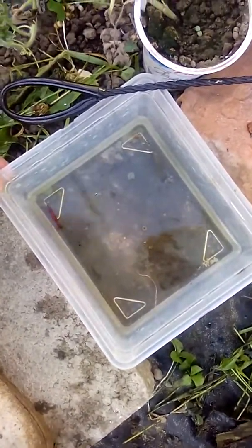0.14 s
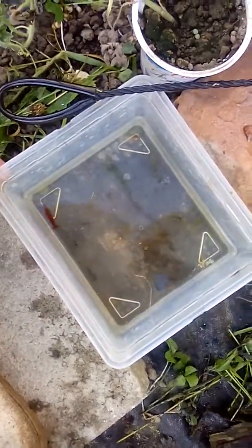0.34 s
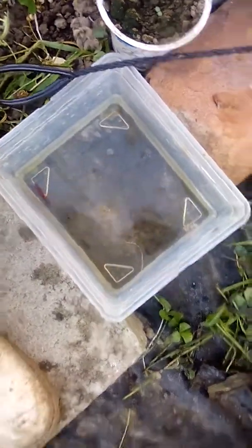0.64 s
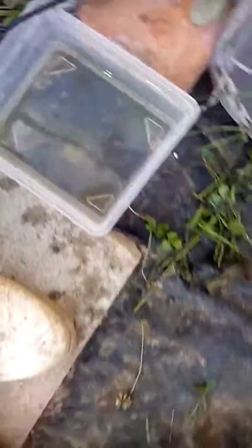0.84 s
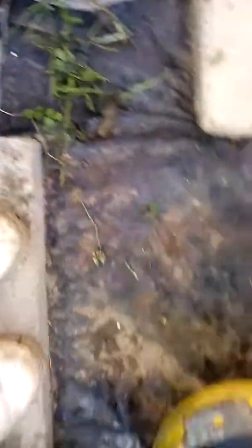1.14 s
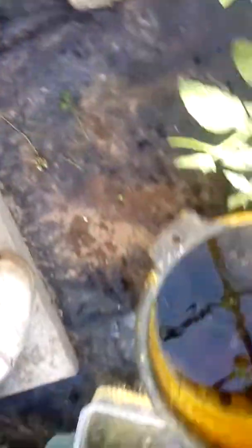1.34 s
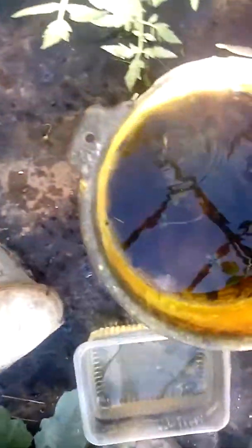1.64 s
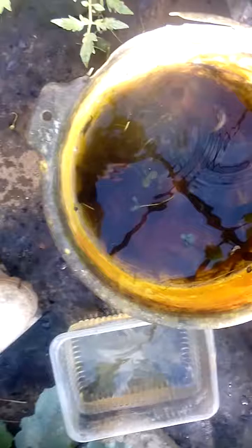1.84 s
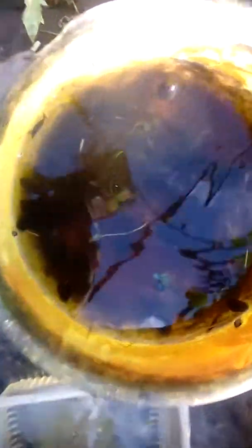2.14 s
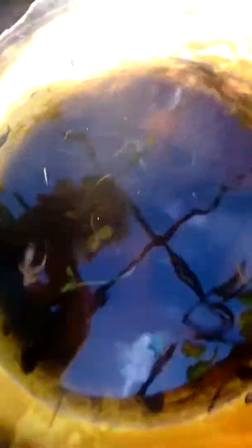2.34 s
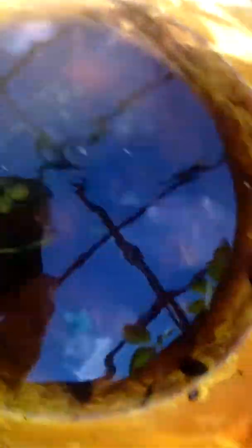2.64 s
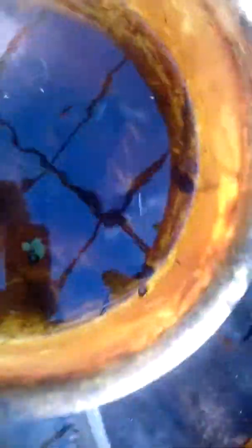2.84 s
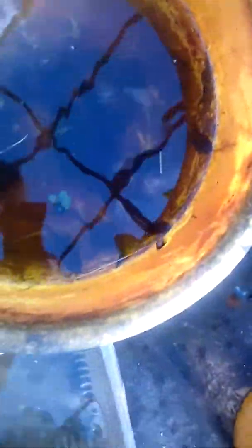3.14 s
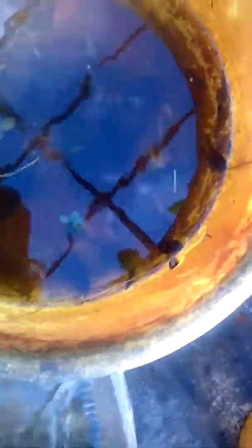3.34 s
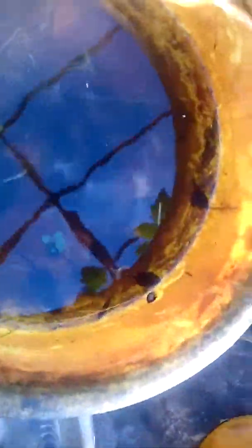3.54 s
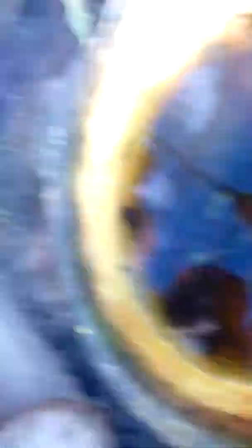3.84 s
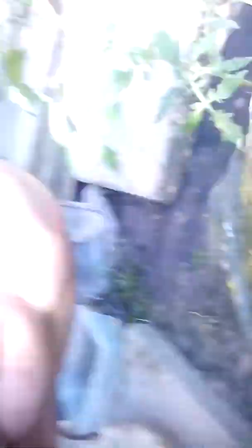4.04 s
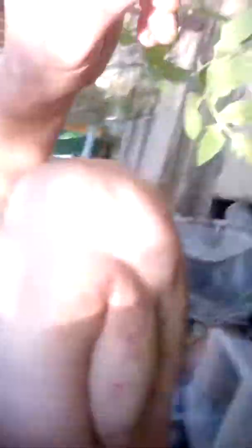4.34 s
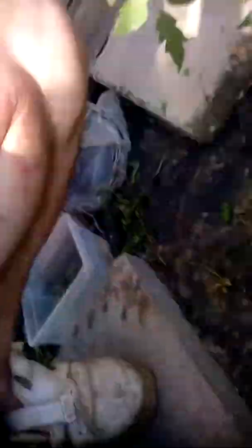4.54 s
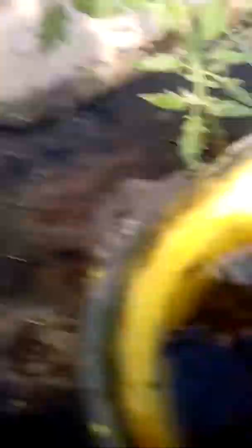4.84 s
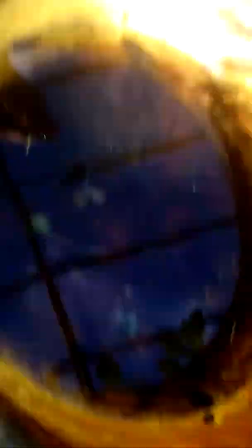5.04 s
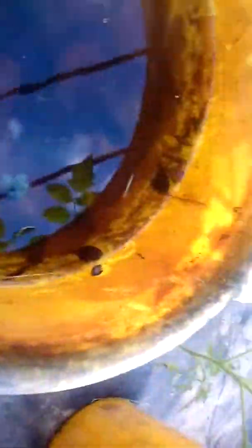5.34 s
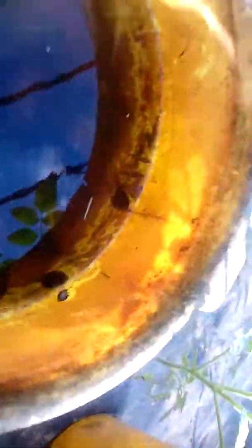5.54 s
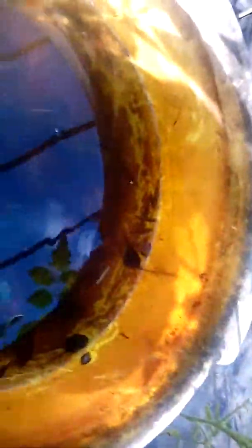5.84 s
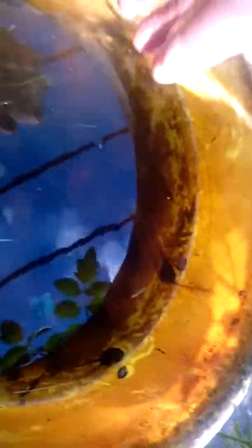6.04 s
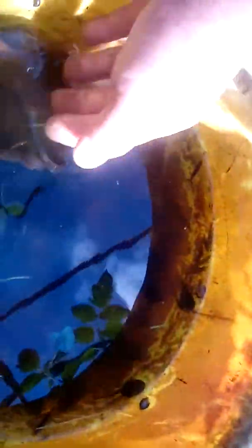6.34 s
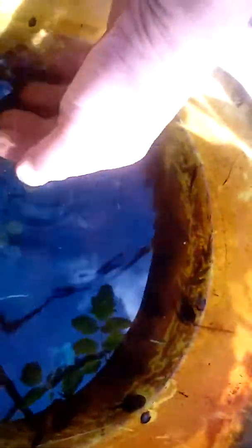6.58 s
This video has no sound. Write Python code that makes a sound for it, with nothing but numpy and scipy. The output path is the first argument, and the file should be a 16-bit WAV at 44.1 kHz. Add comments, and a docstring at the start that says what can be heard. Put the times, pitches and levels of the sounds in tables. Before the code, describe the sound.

Feet thud, scuff and crunch on a gritty plastic sheet in a quiet garden, with one sharp plastic click and clothing swishes.

```python
"""Someone shifts about beside a water tub in a quiet garden, carrying the microphone; air rumbles faintly.
A soft mid-pitched hush swells at the start and again near 4 s; faint soft plops sound from 0.7 s.
From about 1 s feet thud and scuff on a gritty plastic ground sheet, and the tub rings with the scuffs.
At 2.76 s hard plastic gives one sharp click, amid a few small ones; from 2.85 s the sheet crunches.
From 4.7 s clothing swishes. Ground and nearby pots answer briefly; steps shake the microphone."""
import sys
import numpy as np
from scipy import signal
from scipy.fft import rfft, irfft, next_fast_len
from scipy.io import wavfile
from scipy.ndimage import uniform_filter1d, map_coordinates

SR = 44100
rng = np.random.default_rng(int(sys.argv[2]) if len(sys.argv) > 2 else 0)


def inscribe(sig):
    """Save sig as 16-bit PCM at rate SR to the path in sys.argv[1].

    A 1-D sig is mono; a 2-D sig holds one channel per row.
    Samples are clipped to [-1, 1] before scaling.
    """
    pcm = np.round(np.clip(np.atleast_2d(sig).T, -1, 1) * 32767)
    wavfile.write(sys.argv[1], SR, pcm.astype(np.int16))


N = 295911

# air rumble and a soft hush that swells at the start and near 4 s: time_s, rumble_db, hush_db
BACKGROUND_LEVELS = [(0, -69.5, -60.5), (.3, -64, -63), (.7, -63.5, -66.5), (.98, -61, -64.5),
                     (1.12, -67.5, -70), (1.8, -60, -68.5), (2.4, -63, -70), (2.65, -64.5, -71),
                     (3.1, -60.5, -68), (3.4, -64.5, -71.5), (3.8, -63.5, -66.5), (4.05, -64, -62),
                     (4.7, -67.5, -66.5), (5.1, -64, -71.5), (5.35, -64.5, -71.5), (5.45, -65.5, -75),
                     (5.75, -65, -71), (6.15, -64.5, -75), (6.35, -66.5, -74), (6.55, -65.5, -69),
                     (6.7, -66, -72.5)]
# decay of the yard's scatter: freq_hz, t60_s
YARD_DECAY = [(100, 0.48), (1200, 0.21), (5000, 0.26), (12000, 0.0955)]
# plastic tub modes: freq_hz, width_hz, level_db
TUB_MODES = [(549.5, 16, -7), (779, 48.7, -6), (795, 25, -8), (944, 13, -3.5), (1390, 55, -4.5),
             (1800, 29, 4), (2030, 23, -7.5)]
# clothing brushing past: start_s, rise_s, hold_s, t60_s, hiss_db, fold_db, fold_hz
CLOTH_STROKES = [(4.727, 0.16, 0.11, 0.85, -69, -63, 1700), (4.993, 0.076, 0.019, 0.13, -60.5, -77, 2080),
                 (5.01, 0.043, 0.11, 0.21, -72, -63, 687), (5.168, 0.086, 0.0094, 0.17, -54.5, -67, 2200),
                 (5.27, 0.036, 0.013, 0.19, -58, -68.5, 2190),
                 (5.545, 0.025, 0.015, 0.17, -76, -76.5, 2505),
                 (5.777, 0.16, 0.027, 0.17, -75.5, -67.5, 2130)]
# fine grit ticking: start_s, peak_db, resonance_hz
GRIT_TICKS = [(2.098, -48.5, 9400), (2.862, -53.5, 10500), (3, -57, 8100), (3.638, -54, 8000),
              (3.658, -57.5, 7800), (4.017, -52.5, 11000), (4.189, -56.5, 7400), (4.327, -47, 10100),
              (4.5005, -47.5, 11500), (4.537, -53, 12000), (5.07, -53, 7340), (5.087, -52, 7250)]
# creases and grit snapping: start_s, level_db, resonance_hz
CREASE_SNAPS = [(1.5225, -53, 1710), (1.603, -47, 2000), (1.6088, -41, 2000), (1.7173, -47, 1500),
                (1.7235, -46, 2000), (1.9585, -40, 1590), (2.0987, -25, 6400), (2.109, -39, 6030),
                (2.116, -30, 6300), (2.567, -43, 4900), (2.579, -46, 4770), (2.862, -42, 3260),
                (2.9013, -35, 4000), (2.9142, -27, 3420), (2.929, -22, 3700), (2.955, -39, 4200),
                (2.982, -50, 3800), (3.001, -38, 3600), (3.076, -50, 2200), (3.104, -34.5, 5880),
                (4.018, -44, 4870), (4.3268, -28.5, 3220), (4.339, -30, 1900), (4.36, -37, 3000),
                (4.37, -32, 2840), (4.409, -35, 3460), (4.4129, -39, 4070), (4.4237, -22.5, 3350),
                (4.496, -29, 3330), (4.5004, -24, 4150), (4.504, -32, 4640), (4.5369, -28, 3060),
                (4.867, -39.5, 2970), (4.9325, -52, 2900), (4.954, -52, 2710), (4.967, -42, 2560)]
# soles sliding: start_s, rise_s, hold_s, t60_s, rub_db, grit_db, hollow_db, hollow_hz
SOLE_STROKES = [(1.325, 0.077, 0.03, 1, -64.5, -74, -75, 1630),
                (1.516, 0.0022, 0.03, 0.12, -55.5, -65.5, -60, 1580),
                (1.535, 0.023, 0.017, 0.14, -49.5, -62, -62, 1880),
                (1.6, 0.003, 0.0069, 0.18, -47, -57.5, -58, 1990),
                (1.705, 0.008, 0.0052, 0.29, -45.5, -58.5, -51.5, 630),
                (1.79, 0.0025, 0.0052, 0.38, -48, -64.5, -68, 1970),
                (1.875, 0.0054, 0.11, 0.32, -52, -67, -75, 1820),
                (1.955, 0.004, 0.033, 0.6, -41.5, -51, -56.5, 604),
                (1.959, 0.056, 0.027, 0.2, -43.5, -45.5, -43, 1820),
                (2.001, 0.043, .02, 0.24, -58, -46, -49.5, 750),
                (2.084, 0.011, 0.0186, 0.051, -42.5, -46.5, -42.5, 598),
                (2.113, 0.024, 0.0164, 0.13, -42.5, -51, -58, 930),
                (2.321, .05, .01, 0.17, -67, -85, -64, 1050),
                (2.537, 0.14, 0.032, 0.5, -69, -65, -78, 1900),
                (3.03, 0.044, 0.033, 0.063, -43.5, -53, -51.5, 990),
                (3.095, 0.0062, 0.005, 0.44, -60, -60.5, -66.5, 1040),
                (5.56, .02, 0.019, 0.16, -71.5, -73, -82, 3210)]
# sheet crumpling: start_s, rise_s, hold_s, t60_s, rub_db, crackle_db, fizz_db, hollow_db, hollow_hz
SHEET_STROKES = [(2.849, 0.014, 0.015, 0.25, -52.5, -56, -70, -80, 2940),
                 (2.874, 0.043, 0.005, 0.5, -49, -48, -88, -60.5, 1310),
                 (3.624, 0.032, 0.0054, 0.19, -77, -66, -77, -64, 1570),
                 (4.002, 0.0047, 0.014, 0.56, -58.5, -62.5, -90, -59, 1610),
                 (4.272, 0.028, 0.015, 0.27, -77, -59, -101, -62, 3370),
                 (4.32, 0.0056, 0.082, 0.23, -48, -50.5, -74, -66, 1730),
                 (4.376, 0.036, 0.029, 0.42, -44, -45.5, -72.5, -55.5, 734),
                 (4.471, 0.019, 0.026, 0.22, -50.5, -46, -60, -59.5, 583),
                 (4.854, 0.0038, 0.099, 0.38, -62, -67.5, -102, -72.5, 2900)]
# foot thuds and faint soft plops (0.724, 0.887, 2.525 s): start_s, peak_db, pitch_hz, t60_s
THUDS_AND_PLOPS = [(0.724, -55, 417, 0.055), (0.887, -57, 322, 0.099), (1.01, -55, 120, 0.094),
                   (1.32, -55, 106, 0.07), (1.5248, -32, 90, 0.07), (1.5546, -26.5, 90, 0.069),
                   (1.571, -30.5, 81.5, 0.05), (1.603, -41.5, 490, 0.042), (1.67, -37.5, 73, 0.073),
                   (1.710, -31, 595, 0.019), (1.753, -40, 292, 0.028), (2.525, -54.5, 335, 0.076),
                   (2.861, -40, 73.6, 0.066), (3.675, -45.5, 74, 0.092), (4.02, -40, 88.5, 0.026),
                   (5.045, -50.5, 63, 0.076), (5.12, -51, 62, 0.069), (5.33, -54, 231, 0.074)]
# hard plastic flipping: start_s, level_db, pitch_hz, t60_s, snap_relative_db
PLASTIC_CLICKS = [(1.7858, -30.5, 850, 0.0037, -30), (1.7866, -24, 2265, 0.0023, -13.5),
                  (1.8853, -30.5, 2230, 0.0026, -19), (2.7622, -7.5, 1530, 0.0024, -9.5),
                  (2.7643, -36, 1480, 0.0077, 5), (2.7748, -34.5, 1410, 0.0041, -15),
                  (3.656, -47.5, 2320, 0.015, -14), (3.775, -34.5, 1700, 0.0041, -42),
                  (4.0186, -31.5, 1900, 0.0017, -11)]

# low rumble of air and shaken microphone: freq_hz, level_db
RUMBLE_SPECTRUM = [(12, -34), (20, -21.5), (54, -2.5), (107, 0), (145, 0.5), (274, -6), (344, -9),
                   (551, -15.5), (600, -12.5), (780, -42), (1320, -120)]
# soft mid-pitched hush: freq_hz, level_db
HUSH_SPECTRUM = [(210, -41.5), (350, -4.5), (496, -20), (700, -9.5), (1100, -8.5), (1500, -7.5),
                 (2000, -9.5), (2840, -29.5), (5000, -34), (8000, -58)]
# microphone hiss: freq_hz, level_db
HISS_SPECTRUM = [(300, -15.5), (1000, -2), (3000, 0.5), (6000, -0.5), (7960, -14), (11000, -16.5),
                 (15500, -18.5)]
# sliding fabric: freq_hz, level_db
CLOTH_SPECTRUM = [(1760, -8.5), (3000, -14.5), (4030, -2), (5610, -2), (7400, 4.5), (8880, -13.5),
                  (10600, -9.5), (12400, -16.5), (15500, -31.5)]
# rubbing sole: freq_hz, level_db
SOLE_SPECTRUM = [(120, -48.5), (200, -9), (400, -8), (528, -8.5), (639, -1), (703, -2.5), (972, -0.5),
                 (1230, -5.5), (1750, -2), (1900, -6.5), (2070, -4.5), (2440, -3.5), (3500, -31),
                 (4550, -21), (7700, -120)]
# coarse grit: freq_hz, level_db
GRIT_SPECTRUM = [(1410, -34), (2400, -6), (2720, -2), (3400, -2.5), (4410, 2), (6270, 2.5), (6780, -1),
                 (8560, -31), (9410, -25.5), (10500, -26.5), (11400, -25.5), (13100, -37), (15500, -37.5)]
# fizz of the sharpest contacts: freq_hz, level_db
FIZZ_SPECTRUM = [(5000, -33), (8000, 2.5), (11000, -2), (13500, -9.5), (15500, -2)]
# body of the ground sheet: freq_hz, level_db
SHEET_SPECTRUM = [(88, -40), (150, 0), (335, -12), (446, -4), (658, -4.5), (737, 2), (1130, 0),
                  (1520, -5.5), (3000, -13.5), (3900, -24), (6600, -120)]
# crackling creases: freq_hz, level_db
CREASE_SPECTRUM = [(940, -32.5), (1600, 1), (1880, -3), (2210, 1), (2750, 1.5), (3230, 0.5), (3550, 0.5),
                   (4260, 3.5), (7250, -5), (8050, -23), (10900, -22.5), (12000, -23), (15500, -40)]
# snap of hard plastic: freq_hz, level_db
SNAP_SPECTRUM = [(300, -24), (700, 6), (2000, -22), (3200, -6.5), (4300, -2), (5200, -3), (6500, -5),
                 (7500, -43.5), (8500, -41.5), (15000, -37)]
# rattle after a click: freq_hz, level_db
RATTLE_SPECTRUM = [(250, -23), (500, 0), (900, 1), (1400, 2), (2100, -4), (3000, -10), (5000, -9.5),
                   (6500, -15), (8000, -37.5), (15000, -53)]


def amp(db):
    """Decibels to gain."""
    return 10 ** (np.asarray(db) / 20)


def unit(x):
    """Scale to rms 1."""
    return x / np.sqrt(np.mean(x ** 2) + 1e-20)


def along(points, hz):
    """(freq_hz, value) points read on a log axis."""
    freq_hz, values = np.transpose(points)
    return np.interp(np.log(hz + 1), np.log(freq_hz + 1), values)


def add(track, start_s, sound):
    """Mix a sound into a track."""
    part = track[round(start_s * SR):][:len(sound)]
    part += sound[:len(part)]


def filtered(x, response):
    """x through a frequency response."""
    size = next_fast_len(N + 8192)
    return irfft(rfft(x, size) * response(np.fft.rfftfreq(size, 1 / SR)), size)[:N]


def coloured(x, spectrum):
    """x through a spectrum, at rms 1."""
    return unit(filtered(x, lambda hz: amp(along(spectrum, hz))))


def impulse(spectrum, size=1024):
    """Minimum-phase impulse with this spectrum, peak 1."""
    magnitude = amp(along(spectrum, np.fft.rfftfreq(size, 1 / SR)))
    cepstrum = irfft(np.log(magnitude + 1e-6))
    cepstrum[1:size // 2] *= 2
    cepstrum[size // 2 + 1:] = 0
    pulse = irfft(np.exp(rfft(cepstrum)))
    return pulse / np.abs(pulse).max()


def ring(hz, t60_s, attack_s):
    """One damped mode with a soft start, peak 1."""
    t = np.arange(SR // 5) / SR
    wave = np.sin(2 * np.pi * hz * t) * amp(-60 * t / t60_s) * (1 - np.exp(-t / attack_s))
    return wave / np.abs(wave).max()


def wobble(rate_hz, depth_db):
    """Smooth random gain."""
    knots = rng.standard_normal(int(N * rate_hz / SR) + 4)
    return amp(depth_db * map_coordinates(knots, [np.arange(N) * rate_hz / SR]))


def patchy(x, depth_db, below_hz=2800):
    """Lower bands swell and fade independently, shifting the colour; rms 1."""
    hz, _, bands = signal.stft(x, SR, nperseg=512)
    field = uniform_filter1d(rng.standard_normal(bands.shape), size=2, axis=0)
    field = unit(uniform_filter1d(field, size=22, axis=1))
    swell_db = field * depth_db / (1 + (hz[:, None] / below_hz) ** 2)
    return unit(signal.istft(bands * amp(swell_db), SR, nperseg=512)[1][:N])


def gains(strokes):
    """Strokes build, hold and decay: one gain curve per level column."""
    t, power = np.arange(N) / SR, 0
    for start_s, rise_s, hold_s, t60_s, *levels_db in strokes:
        rise = np.clip((t - start_s) / rise_s, 0, 1)
        decay = amp(-60 * np.maximum(t - start_s - rise_s - hold_s, 0) / t60_s)
        power = power + np.outer(amp(levels_db), rise * decay) ** 2
    return np.sqrt(power)


def grains(rate_hz, spread_db, share):
    """Tiny uneven contacts take a share of the power; the rest is smooth friction."""
    contacts = (rng.random(N) < rate_hz / SR) * rng.choice([-1, 1], N)
    sizes = amp(spread_db * np.clip(rng.standard_normal(N), -2, 2))
    return np.sqrt(share) * unit(contacts * sizes) + np.sqrt(1 - share) * rng.standard_normal(N)


def background(hiss_db=-74):
    """Uneven low air rumble, a soft swelling hush and steady microphone hiss."""
    time_s, *levels_db = np.transpose(BACKGROUND_LEVELS)
    rumble_gain, hush_gain = [amp(np.interp(np.arange(N) / SR, time_s, db)) for db in levels_db]
    rumble = unit(coloured(rng.standard_normal(N), RUMBLE_SPECTRUM) * wobble(rate_hz=14, depth_db=2.7))
    hiss = coloured(rng.standard_normal(N), HISS_SPECTRUM)
    hush = patchy(coloured(rng.standard_normal(N), HUSH_SPECTRUM), depth_db=3.2)
    return rumble_gain * rumble + hush_gain * hush + amp(hiss_db) * hiss


def jostle(steps, gain_db=-27, exponent=0.66, settle_s=0.032):
    """Each shift of weight shakes the carried microphone, which rumbles until it settles."""
    pole = np.exp(-1 / (settle_s * SR))
    shake = signal.lfilter([1 - pole], [1, -pole], np.abs(steps))
    return amp(gain_db) * shake ** exponent * coloured(rng.standard_normal(N), RUMBLE_SPECTRUM)


def yard(x, wet_db, bounce_s=0.016, bounce_db=-27):
    """One bounce off the ground and a short scatter from pots and walls."""
    hz, t, bands = signal.stft(rng.standard_normal(SR // 3), SR, nperseg=256)
    decay = amp(-60 * t / along(YARD_DECAY, hz)[:, None])
    tail = signal.istft(bands * decay, SR, nperseg=256)[1]
    scatter = signal.fftconvolve(x, tail / np.linalg.norm(tail))[:N]
    bounce = filtered(x, lambda f: np.exp(-2j * np.pi * f * bounce_s))
    return amp(bounce_db) * bounce + amp(wet_db) * scatter


def tub(x, gain_db=-3):
    """The nearby plastic tub rings along in a few short modes."""
    def modes(f):
        return sum((-1) ** k * amp(db) * 1j * f * width_hz / (hz ** 2 - f ** 2 + 1j * f * width_hz)
                   for k, (hz, width_hz, db) in enumerate(TUB_MODES))
    return amp(gain_db) * filtered(x, modes)


def hollow(strokes, contacts, q):
    """A gap or fold rings at its own pitch in each stroke."""
    out = np.zeros(N)
    for start_s, rise_s, hold_s, t60_s, *_, db, hz in strokes:
        gain, = gains([(start_s, rise_s, hold_s, t60_s, db)])
        gap = signal.iirpeak(hz, q, SR)
        out += gain * unit(signal.lfilter(*gap, signal.lfilter(*gap, contacts)))
    return out


def swishes(hiss_db=-1):
    """Fabric slides over itself with a fine hiss; its folds catch unevenly and sound hollow."""
    hiss_gain, = gains([row[:-2] for row in CLOTH_STROKES])
    fibres = grains(rate_hz=1700, spread_db=2, share=0.59)
    folds = patchy(fibres * wobble(rate_hz=60, depth_db=1.5), depth_db=4)
    hiss = amp(hiss_db) * hiss_gain * coloured(fibres, CLOTH_SPECTRUM)
    return hiss + hollow(CLOTH_STROKES, folds, q=2.8)


def ticks(t60_s=0.0175, q=7):
    """Single hard grains skid and ring, high and brief."""
    out, t = np.zeros(N), np.arange(SR // 50) / SR
    for start_s, peak_db, hz in GRIT_TICKS:
        skid = rng.standard_normal(len(t)) * amp(-60 * t / t60_s)
        tick = signal.lfilter(*signal.iirpeak(hz, q, SR), skid)
        add(out, start_s, amp(peak_db) * tick / np.abs(tick).max())
    return out


def snaps(gain_db=-1, t60_s=0.004, body_db=-12, ring_db=3, q=6.7):
    """The largest creases and grains let go in short bursts, each with its own resonance."""
    out, t = np.zeros(N), np.arange(SR // 50) / SR
    colour = impulse(CREASE_SPECTRUM) + amp(body_db) * impulse(SHEET_SPECTRUM)
    for start_s, db, hz in CREASE_SNAPS:
        burst = np.convolve(rng.standard_normal(len(t)) * amp(-60 * t / t60_s), colour)
        resonance = signal.lfilter(*signal.iirpeak(hz, q, SR), burst)
        snap = unit(burst) + amp(ring_db) * unit(resonance)
        add(out, start_s, amp(db + gain_db) * snap / np.abs(snap).max())
    return out


def scuffs(body_db=-1, fizz_db=-62, fizz_exponent=4):
    """Fine grit sounds in a dragged sole and the gap under it; coarse grit crackles, fizzes if pressed."""
    rub_gain, grit_gain = gains([row[:-2] for row in SOLE_STROKES])
    fine = grains(rate_hz=3000, spread_db=2, share=0.32) * wobble(rate_hz=90, depth_db=0.7)
    coarse = grains(rate_hz=900, spread_db=3, share=0.65) * wobble(rate_hz=140, depth_db=1.8)
    rub = rub_gain * patchy(coloured(fine, SOLE_SPECTRUM), depth_db=5.5)
    body = amp(body_db) * (rub + hollow(SOLE_STROKES, fine, q=3.3))
    crackle = grit_gain * coloured(coarse, GRIT_SPECTRUM)
    pressure = grit_gain / grit_gain.max()
    fizz = amp(fizz_db) * pressure ** fizz_exponent * coloured(coarse, FIZZ_SPECTRUM)
    return body + tub(body) + crackle + fizz


def crunches(rub_db=-3.5, crackle_db=-1.5):
    """The sheet gives way in clumps of small buckles; only the sharpest fizz."""
    rub_gain, crackle_gain, fizz_gain = gains([row[:-2] for row in SHEET_STROKES])
    buckles = grains(rate_hz=1400, spread_db=4, share=0.45) * wobble(rate_hz=110, depth_db=1.6)
    sharpest = grains(rate_hz=500, spread_db=4, share=0.7) * wobble(rate_hz=160, depth_db=3)
    rub = amp(rub_db) * rub_gain * coloured(buckles, SHEET_SPECTRUM)
    crackle = amp(crackle_db) * crackle_gain * coloured(buckles, CREASE_SPECTRUM)
    fizz = fizz_gain * coloured(sharpest, FIZZ_SPECTRUM)
    return rub + crackle + fizz + hollow(SHEET_STROKES, buckles, q=2.7)


def thuds_and_plops():
    """Thuds of weight landing and a few faint plops: one quickly damped mode each."""
    out = np.zeros(N)
    for start_s, peak_db, hz, t60_s in THUDS_AND_PLOPS:
        add(out, start_s, amp(peak_db) * ring(hz, t60_s, attack_s=0.29 / hz))
    return out


def clicks(chatter_db=-27, chatter_t60_s=0.016, rattle_db=-36, rattle_t60_s=0.34, highpass_hz=380):
    """Stiff plastic flips: damped mode, bright snap, chatter, faint rattle. The thin wall has no bass."""
    out, t = np.zeros(N), np.arange(SR // 5) / SR
    snap, colour = impulse(SNAP_SPECTRUM), impulse(RATTLE_SPECTRUM)
    colour /= np.linalg.norm(colour)
    fade = amp(chatter_db - 60 * t / chatter_t60_s) + amp(rattle_db - 60 * t / rattle_t60_s)
    for start_s, db, hz, t60_s, snap_db in PLASTIC_CLICKS:
        rattle = np.convolve(rng.standard_normal(len(t)) * fade, colour)
        add(out, start_s, -amp(db) * ring(hz, t60_s, attack_s=4 / hz))
        add(out, start_s, -amp(db + snap_db) * snap)
        add(out, start_s, amp(db) * rattle)
    return signal.lfilter(*signal.butter(2, highpass_hz, "high", fs=SR), out)


def scene():
    """Movements and their reflections over the background, mono."""
    impacts = thuds_and_plops() + crunches()
    plastic = clicks()
    movement = impacts + scuffs() + snaps() + ticks() + swishes()
    reflections = yard(movement, wet_db=-11.5) + yard(plastic, wet_db=-25)
    return (movement + plastic + reflections + jostle(impacts) + background())[None]


def record(dry, top_hz=15600):
    """Brick-wall low-pass at the recorder's band limit."""
    return filtered(dry[0], lambda hz: hz < top_hz)[None]


dry = scene()
out = record(dry)
inscribe(out)
```